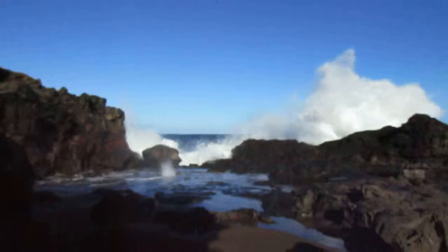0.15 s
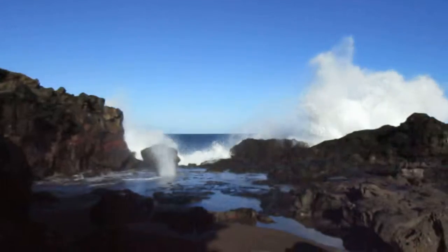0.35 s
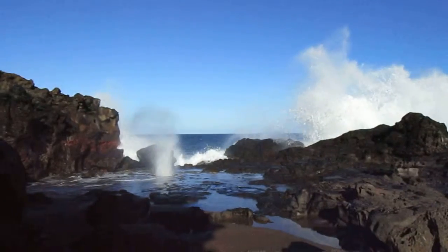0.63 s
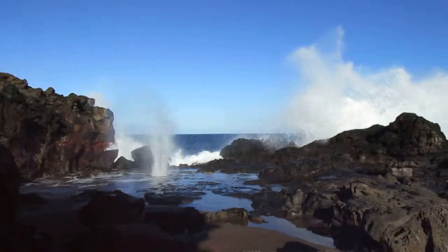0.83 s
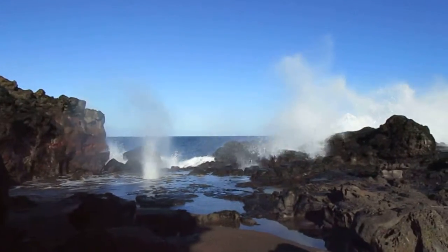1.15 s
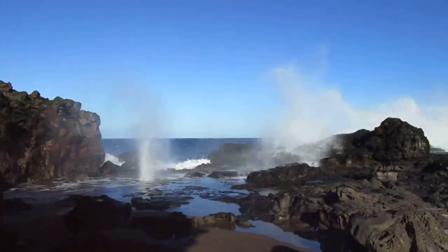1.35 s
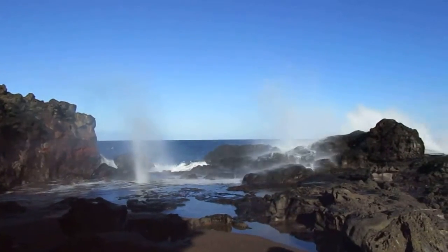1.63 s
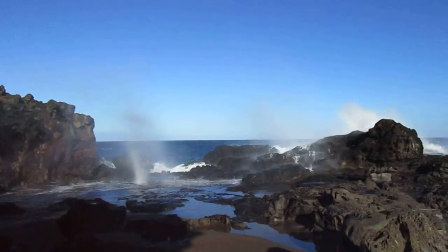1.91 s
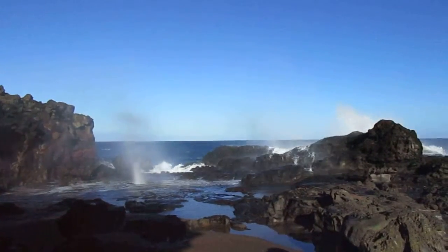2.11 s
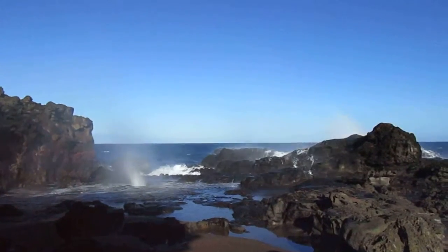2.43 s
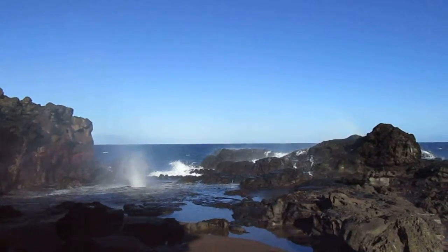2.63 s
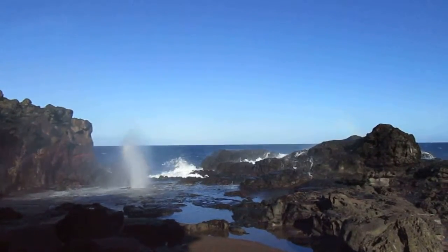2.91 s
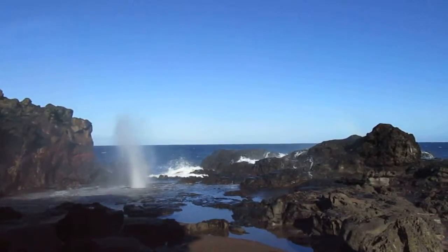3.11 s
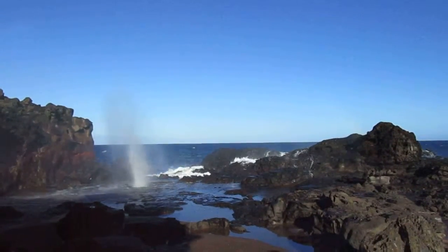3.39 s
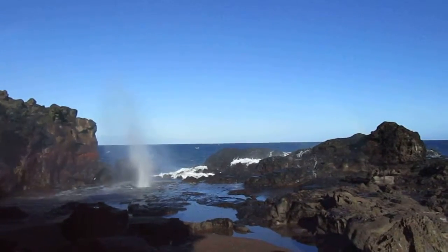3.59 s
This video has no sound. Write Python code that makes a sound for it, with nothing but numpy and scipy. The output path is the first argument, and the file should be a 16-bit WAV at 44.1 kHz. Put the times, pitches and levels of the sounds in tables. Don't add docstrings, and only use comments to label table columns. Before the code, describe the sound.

Heavy wind thumping on a small camera microphone, with sea spray hissing and surf behind

```python
import sys
import numpy as np
from scipy import signal
from scipy.fft import rfft, irfft
from scipy.io import wavfile
from scipy.ndimage import uniform_filter1d

SR = 44100
rng = np.random.default_rng(int(sys.argv[2]) if len(sys.argv) > 2 else 0)


def rack_gain(trim_db):
    fader = np.asarray(trim_db, float)
    return 10 ** (fader / 20)


def unload_wav(signal):
    wavfile.write(
        sys.argv[1],
        SR,
        np.round(np.clip(np.atleast_2d(signal).T, -1, 1) * 32767).astype(np.int16),
    )


N = 165375


def shape(x, gain):
    n = x.shape[-1]
    hz = np.maximum(np.arange(n // 2 + 1) * SR / n, 1.)
    return irfft(rfft(x) * gain(hz), n)


def colour(table):
    hz, db = np.array(table, float).T
    return lambda f: rack_gain(np.interp(np.log(f), np.log(hz), db))


def curve(table, t):
    s, db = np.array(table, float).T
    return rack_gain(np.interp(t, s, db))


def unit(x):
    return x / np.sqrt(np.mean(x ** 2, axis=-1, keepdims=True))


def walk(rate):
    k = int(SR / rate)
    held = np.repeat(rng.standard_normal(N // k + 1), k)
    return 1.67 * uniform_filter1d(uniform_filter1d(held, k), k)[:N]


def wash(table, swell_db, flicker_db):
    out, swell = 0, walk(4.63)
    for hz in 90 * 2 ** np.arange(0, 8, .5):
        overlap = lambda f: np.cos(np.pi * np.clip(np.log2(f / hz), -.5, .5))
        band = shape(rng.standard_normal(N), lambda f: overlap(f) * colour(table)(f))
        out = out + band * rack_gain(swell_db * swell + flicker_db * walk(8.41))
    return out


# time in seconds, level in dB before the gain steps.
SPRAY = [(.19, -39.5), (.6, -42), (.75, -39.5), (.9, -35), (1.1, -39), (1.25, -36.5), (1.421, -33.5),
         (1.66, -33), (1.849, -35), (2.0, -40), (2.45, -39), (2.7, -36), (2.95, -40.5), (3.2, -42),
         (3.5, -45.5), (3.75, -45)]
# frequency in Hz, density in dB per Hz.
SPRAY_COLOUR = [(500, -13), (1000, -4), (2000, -0.5), (4000, -2.5), (7000, -4.5), (10000, -7.5),
                (13000, -15.5), (16000, -27)]


def spray_jet(t):
    spray = wash(SPRAY_COLOUR, .3, .5)
    top = shape(spray, lambda f: (f > 5500) * (f < 12000))
    return spray / np.std(top) * curve(SPRAY, t)


# time in seconds, level in dB before the gain steps.
SURF = [
    (.19, -36),
    (2.0, -44.5),
    (2.9, -36.5),
    (3.75, -41),
]
# frequency in Hz, density in dB per Hz.
SURF_COLOUR = [(100, 4.5), (300, -11), (600, -2.5), (1200, -4), (2200, -2), (3500, -8), (6000, -24),
               (12000, -61)]


def surf_roar(t):
    return unit(wash(SURF_COLOUR, .6, 1.)) * curve(SURF, t)


# centre in Hz, width in Hz, depth from 0 to 1.
NOTCHES = [
    (816, 120, 0.4),
    (3096, 900, 0.47),
    (4810, 1030, 0.87),
]


def housing(f):
    return np.prod([1 - np.clip(d, 0, 1) / (1 + (2 * (f - hz) / w) ** 2) for hz, w, d in NOTCHES], axis=0)


def turbulence(size):
    pops_per_s, pop_share = 170, .75
    smooth, place = rng.standard_normal(size), rng.random(size)
    pops = smooth * (place < pops_per_s / SR) * np.sqrt(SR / pops_per_s)
    return np.sqrt(pop_share) * pops + np.sqrt(1 - pop_share) * rng.standard_normal(size)


def eddy_law(hz):
    def law(f):
        hump = (f / hz) ** 0.48 / (1 + (f / hz / 1.199) ** 2.896)
        cavity = 1 / np.sqrt(1 + (f / 655) ** 20)
        return hump * cavity / (1 + (4.8 / f) ** 2)
    return law


# time in seconds, level in dB, share of small eddies from 0 to 1.
BREEZE = [(.19, -30, 0.25), (.36, -20, 0.25), (.58, -17.5, 0.01), (.75, -25.5, 0.45), (1.1, -25.5, 0.97),
          (1.6, -25, 0.47), (2.0, -19.5, 0.19), (2.25, -25.5, 0.17), (2.37, -38, 0.6), (2.48, -32, 0.3),
          (2.56, -28, 0.2), (2.75, -27, 0.8), (3.08, -37.5, 0.33), (3.2, -25.5, 0.05), (3.35, -29, 0.63),
          (3.53, -30.5, 0.05), (3.75, -41.5, 0.21)]


def breeze(t):
    def layer(hz, flicker_rate):
        law = lambda f: eddy_law(hz)(f) / (1 + (f / 560) ** 2)
        return unit(shape(turbulence(N), law)) * rack_gain(2 * walk(flicker_rate))
    s, db, small = np.array(BREEZE, float).T
    mix = np.clip(np.interp(t, s, small), 0, 1)
    low, high = layer(60., 27), layer(200., 66)
    return rack_gain(np.interp(t, s, db)) * (np.sqrt(1 - mix) * low + np.sqrt(mix) * high)


def bursts(centre, length, db, law, strike):
    size = 8192
    t = (np.arange(size) - size // 2) / SR
    x = shape(turbulence((len(centre), size)), law)
    x = x / np.abs(signal.hilbert(x)) ** 0.54
    x = unit(shape(x, lambda f: np.abs(law(f)) ** 0.34))
    phase = np.exp(2j * np.pi * rng.random((len(centre), 1)))
    jump = shape((t == 0) + 0 * x, lambda f: law(f) * phase)
    jump = jump / np.abs(jump).max(axis=1)[:, None]
    x = x + np.minimum(0.038 / length, strike)[:, None] * jump
    env = np.exp(-2 * np.abs(t / (1.783 * length[:, None] / 2)) ** 1.68)
    loudness = np.sqrt(np.sum((x * env) ** 2, axis=1) / np.sum(env ** 2, axis=1))
    x = x * env / loudness[:, None]
    out = np.zeros(N + 2 * size)
    for row, s, g in zip(x, centre, rack_gain(db)):
        i = int(s * SR) + size // 2
        out[i:i + size] += g * row
    return out[size:size + N]


def eddies(table, strike):
    centre, length, db, hz = np.array(table, float).T
    thumps = bursts(centre, length, db, eddy_law(hz[:, None]), strike)
    return shape(thumps, lambda f: 1 / (1 + (f / 793) ** 8))


# centre in seconds, length in seconds, level in dB, pitch in Hz.
EDDIES = [(0.198, 0.015, -19, 149), (0.228, 0.018, -19, 153), (0.27, 0.015, -8, 183),
          (0.381, 0.038, -10.5, 110), (0.474, 0.1, -19, 79), (0.515, 0.044, -10, 100),
          (0.541, 0.068, -11.5, 92), (0.617, 0.033, -13.5, 154), (0.687, 0.032, -30, 119),
          (0.724, 0.024, -36, 180), (0.786, 0.062, -24, 152), (0.912, 0.027, -6.5, 172),
          (0.996, 0.035, -7.5, 214), (1.031, 0.014, -7.5, 281), (1.061, 0.0094, -13, 273),
          (1.17, 0.022, -15.5, 245), (1.261, 0.16, -24, 166), (1.389, 0.046, -27.5, 238),
          (1.48, 0.053, -14.5, 225), (1.507, 0.011, -10.5, 240), (1.527, 0.022, -18.5, 191),
          (1.566, 0.074, -18.5, 170), (1.72, 0.05, -19.5, 121), (1.802, 0.009, -13, 152),
          (1.836, 0.029, -14.5, 194), (1.877, 0.021, -9, 134), (1.897, 0.031, -11.5, 89),
          (1.981, 0.015, -10.5, 90), (2.014, 0.027, -11.5, 169), (2.057, 0.021, -8.5, 111)]
# centre in seconds, length in seconds, level in dB, pitch in Hz.
GUSTS = [(2.079, 0.011, -4, 460), (2.121, 0.021, -9.5, 266), (2.154, 0.02, -10, 149),
         (2.199, 0.019, -6, 200), (2.264, 0.04, -19, 330), (2.287, 0.022, -9.5, 164),
         (2.336, 0.016, -6, 200), (2.399, 0.018, -16.5, 386), (2.422, 0.0061, -18, 302),
         (2.469, 0.033, -16.5, 210), (2.511, 0.037, -21.5, 131), (2.613, 0.053, -24.5, 201),
         (2.675, 0.016, -7, 126), (2.727, 0.029, -11, 260), (2.779, 0.022, -10, 225),
         (2.844, 0.024, -15.5, 346), (2.892, 0.013, -22.5, 257), (2.941, 0.061, -25.5, 162),
         (2.992, 0.015, -9, 225), (3.031, 0.021, -23.5, 189), (3.137, 0.012, -27, 130),
         (3.195, 0.02, -20, 118), (3.275, 0.014, -14, 202), (3.34, 0.017, -30.5, 300),
         (3.391, 0.01, -31, 304), (3.412, 0.011, -15, 259), (3.445, 0.034, -20.5, 229),
         (3.489, 0.012, -9, 122), (3.562, 0.019, -20.5, 135), (3.622, 0.037, -25, 121)]


def main_eddies():
    return eddies(EDDIES, 5.9) + eddies(GUSTS, 5.9)


# start in seconds, cut in dB, recovery time in seconds.
DUCKS = [
    (.275, 2, 0.07),
    (.915, 4, 0.14),
    (1.0, 4.5, 0.063),
    (1.88, 1.5, 0.64),
    (2.079, 11.5, 8),
    (2.2, 2.5, 0.43),
    (2.335, 7, 13),
]


def auto_gain(t):
    start, db, back = np.array(DUCKS, float).T[:, :, None]
    since = np.maximum(t - start, 0)
    cut = db * (1 - np.exp(-since / 0.0088)) * np.exp(-since / back)
    return rack_gain(-np.sum(cut, axis=0))


# centre in seconds, length in seconds, level in dB, pitch in Hz.
SWIRLS = [(.43, 0.029, -12.5, 60), (.65, 0.059, -26, 200), (.74, 0.076, -34, 356), (.80, 0.047, -30.5, 348),
          (.86, 0.059, -24, 300), (1.086, 0.011, -19, 250), (1.147, 0.019, -20, 293),
          (1.205, 0.017, -24.5, 300), (1.35, 0.05, -31, 346), (1.615, .012, -23.5, 180),
          (1.632, .012, -23, 380), (1.69, 0.03, -31.5, 354), (2.111, 0.006, -15, 300),
          (2.25, .012, -15.5, 300), (2.322, 0.0096, -18.5, 332), (2.346, 0.009, -21.5, 380),
          (2.39, 0.0095, -18, 400), (2.414, .007, -17, 302), (2.431, 0.0059, -10.5, 352),
          (2.712, 0.0076, -23, 298), (2.747, 0.011, -11, 380), (2.81, 0.016, -22, 250),
          (3.007, 0.0069, -20.5, 330), (3.434, 0.008, -19.5, 382), (1.045, 0.0056, -30, 350),
          (2.363, 0.021, -32, 180), (.30, 0.029, -33, 280), (1.86, 0.0084, -21.5, 380)]


def swirls():
    return eddies(SWIRLS, 2.3)


# frequency in Hz, density in dB per Hz.
FLUTTER_COLOUR = [(250, -5), (500, 6), (780, -3.5), (1400, -1), (2000, -10), (2700, -20.5), (3400, -48),
                  (5000, -44)]


def flutter(table):
    centre, db, length = np.array(table, float).T

    def edge(f):
        dulling = rack_gain(0.34 * (db[:, None] + 8.5) * f / 1000)
        return colour(FLUTTER_COLOUR)(f) * dulling / (1 + (f / 5000) ** 10)
    return bursts(centre, np.clip(length, .002, .04), db + 6, edge, 2.6)


# centre in seconds, level in dB, length in seconds.
FLUTTER = [(.612, -31.5, 0.014), (0.911, -28.5, 0.011), (1.06, -25.5, 0.0062), (1.112, -29.5, 0.016),
           (1.168, -28.5, 0.0085), (2.083, -15.5, 0.0019), (2.123, -25.5, 0.0069), (2.196, -50, 0.0093),
           (2.211, -34, 0.0088), (2.234, -24.5, 0.0049), (2.25, -36, 0.0055), (2.255, -22.5, 0.01),
           (2.267, -21.5, 0.0092), (2.275, -26.5, 0.0094), (2.283, -28.5, .012), (2.328, -19, 0.0095),
           (2.333, -19.5, 0.0039), (2.341, -47, 0.0052), (2.398, -32, 0.0063), (2.405, -31.5, 0.017),
           (2.413, -27, 0.0042), (2.432, -29, 0.0044), (2.473, -39, 0.0088)]
# centre in seconds, level in dB, length in seconds.
LATE_FLUTTER = [(2.743, -23.5, 0.0084), (2.758, -27.5, 0.0063), (2.78, -25, 0.011), (2.785, -30, 0.0072),
                (2.843, -34, 0.0089), (2.854, -25.5, 0.0063), (2.857, -27, 0.0035), (2.89, -42, 0.0067),
                (2.991, -24.5, 0.0063), (3.395, -33, 0.004), (3.414, -39, 0.004), (3.435, -32, 0.0029)]


def edge_flutter():
    return flutter(FLUTTER) + flutter(LATE_FLUTTER)


# time in seconds, level in dB.
CLICKS = [
    (.917, -44),
    (2.082, -49),
    (2.332, -48),
]


def loud_clicks():
    s, db = np.array(CLICKS, float).T
    click = lambda f: f ** -.5 * (f > 1500) / (1 + (f / 9000) ** 4)
    return bursts(s, .0012 + 0 * s, db, click, 8.)


# centre in seconds, level in dB, length in seconds.
MORE_FLUTTER = [(1.009, -29.5, 0.0067), (1.147, -34, 0.0054), (2.111, -40, 0.0036), (2.129, -38, 0.0044),
                (2.202, -40, .004), (2.228, -39, 0.0034), (2.263, -34, .004), (2.288, -33, .004),
                (2.325, -27, 0.0047), (2.347, -34.5, 0.0025), (2.426, -30.5, 0.0054), (2.645, -44, 0.0036),
                (2.748, -28, 0.0036), (3.274, -40, 0.0085), (3.403, -32, 0.0048), (3.441, -43, .005),
                (2.079, -25.5, 0.0073), (2.576, -45, 0.0072), (3.191, -50, 0.0036)]


def more_flutter():
    return flutter(MORE_FLUTTER)


def scene():
    t = np.arange(N) / SR
    sea = shape(spray_jet(t) + surf_roar(t), housing) * auto_gain(t)
    wind = breeze(t) + main_eddies() + swirls() + edge_flutter() + loud_clicks() + more_flutter()
    return (sea + wind)[None]


def low_pass(x):
    return signal.sosfilt(signal.butter(12, 15720, fs=SR, output="sos"), x)


def record(dry):
    x = dry * np.clip((np.arange(N) / SR - .1905) / 0.0042, 0, 1)
    x = x / (1 + x ** 20) ** (1 / 20)
    x = shape(x, lambda f: f < 15740)
    return low_pass(x)


dry = scene()
out = record(dry)
unload_wav(out)
```